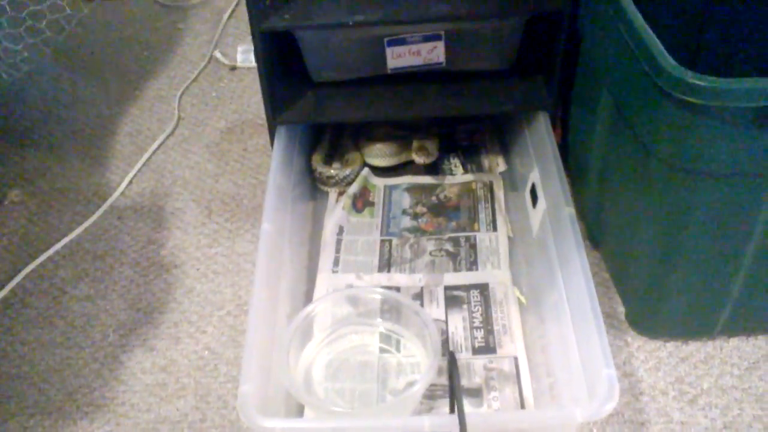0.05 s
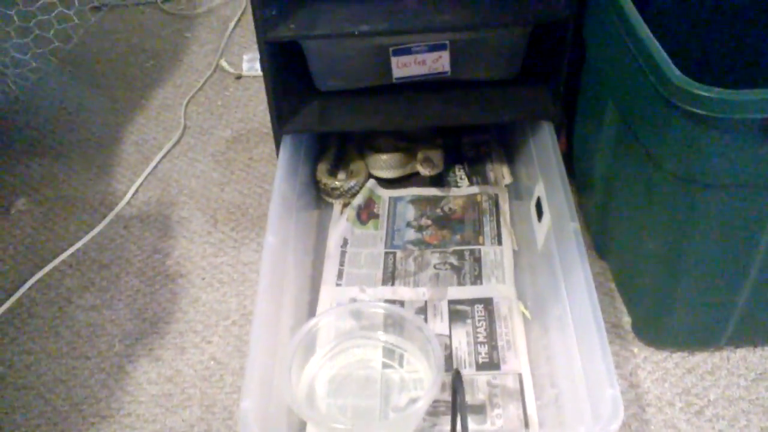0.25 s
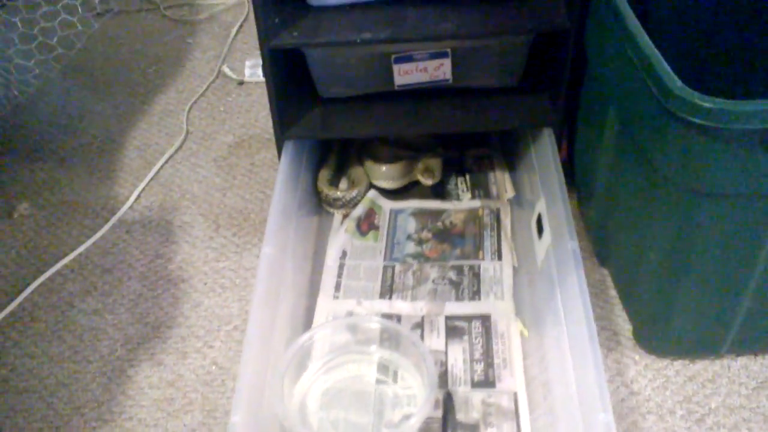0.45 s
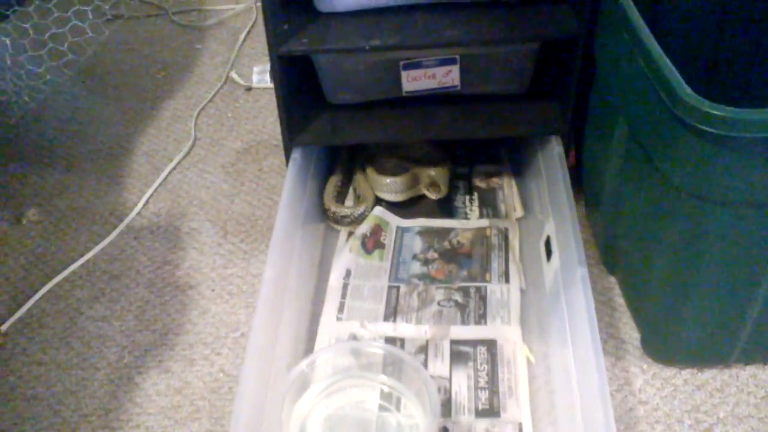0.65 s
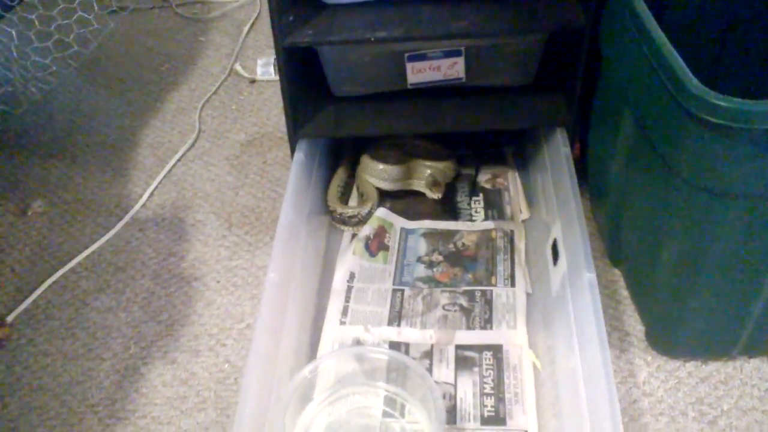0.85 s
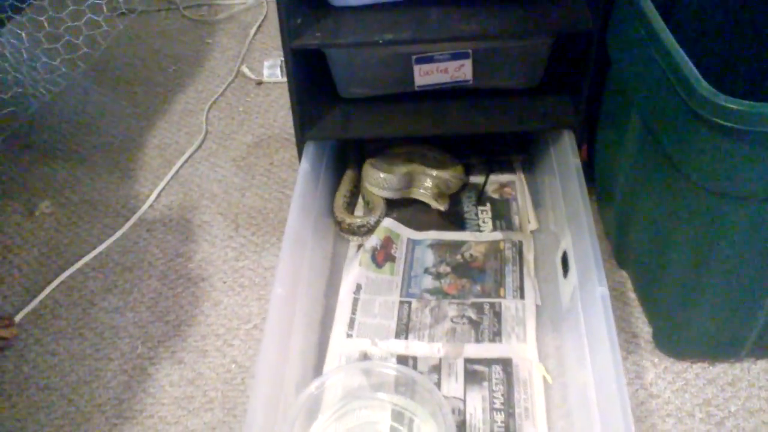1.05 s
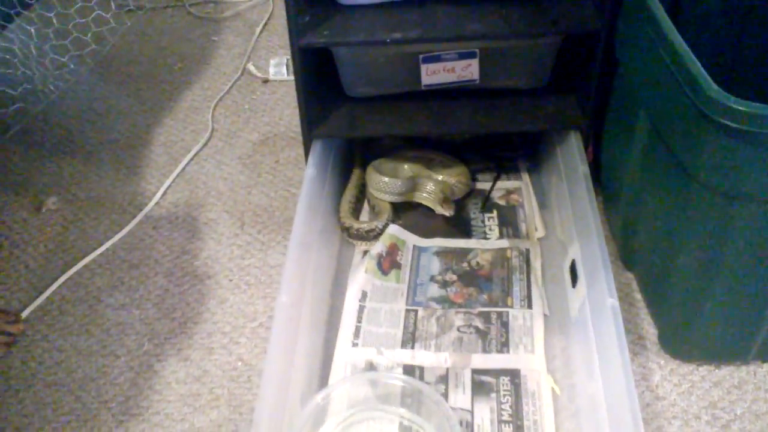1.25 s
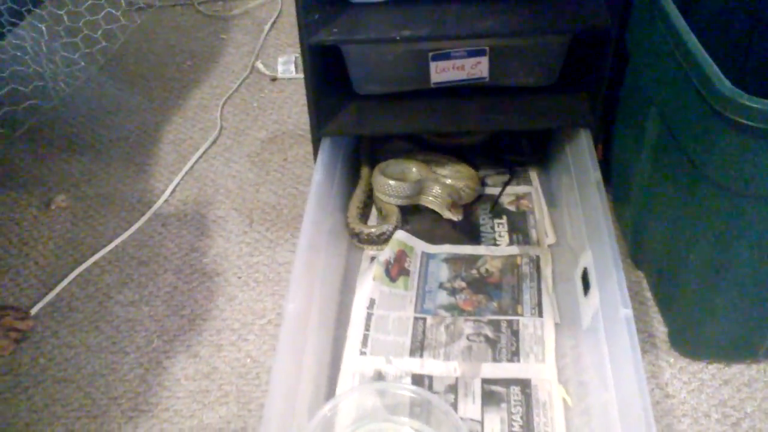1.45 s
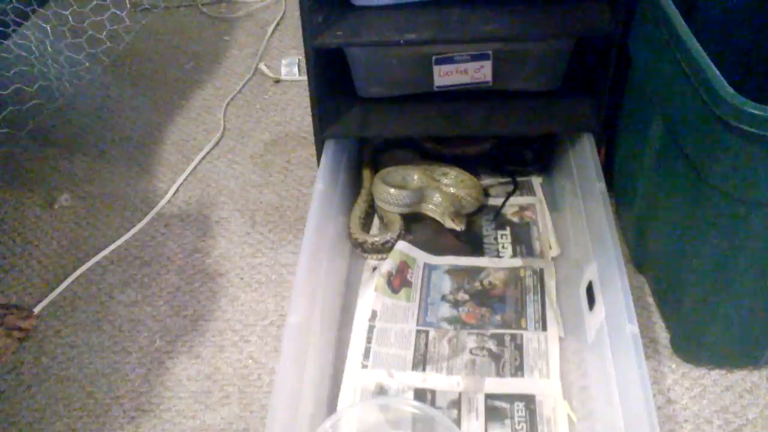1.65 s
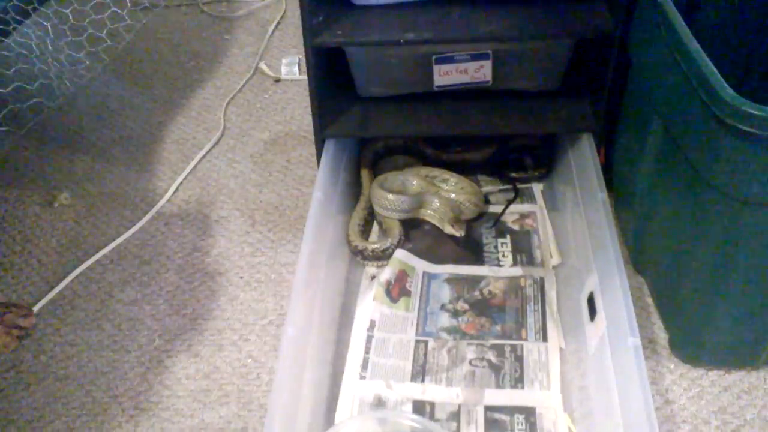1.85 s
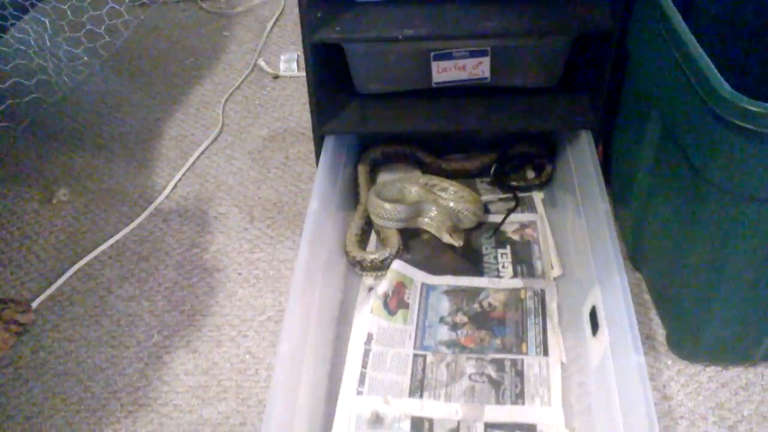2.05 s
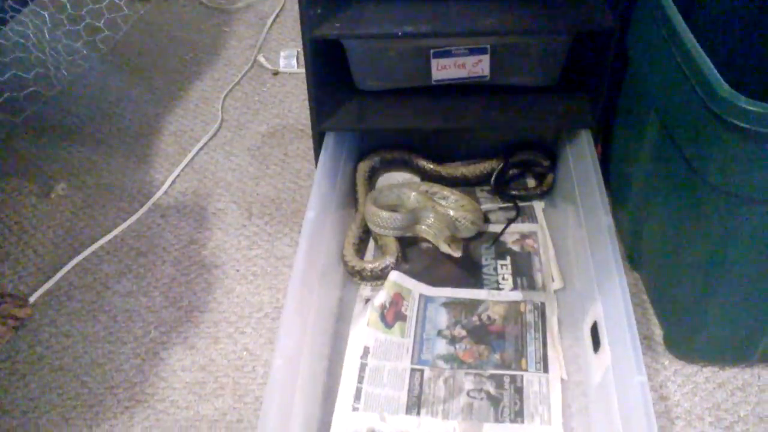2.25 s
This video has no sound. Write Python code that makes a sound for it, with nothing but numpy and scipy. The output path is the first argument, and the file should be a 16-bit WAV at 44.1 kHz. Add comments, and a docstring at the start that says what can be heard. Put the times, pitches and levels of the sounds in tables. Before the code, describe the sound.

In a quiet room, a plastic drawer is pulled out, rumbling and rasping unevenly as its runners catch and slip. Near the end a snake's short hiss swells, and the drawer stops with a soft bump.

```python
"""Sliding a snake's drawer

A plastic tub drawer slides along its rack in a quiet carpeted room. The runners catch
and slip, so the tub rumbles and drones, and scrapes more brightly when pulled faster.
The snake inside hisses faintly, then gives one short, stronger hiss as the drawer stops."""
import sys
import numpy as np
from scipy import signal
from scipy.fft import rfft, irfft
from scipy.io import wavfile

SR = 44100
rng = np.random.default_rng(int(sys.argv[2]) if len(sys.argv) > 2 else 0)


def wav_out(sig):
    """Save sig, one row per channel (or a flat mono array), as 16-bit PCM at SR to the path in sys.argv[1]."""
    wavfile.write(sys.argv[1], SR, np.round(np.clip(np.atleast_2d(sig).T, -1, 1) * 32767).astype(np.int16))


N = 105840
T = np.arange(N) / SR

# the notes at which the tub's floor rings: pitch_hz, width_hz, level_db
TUB_NOTES = [(199.3, 13, -12), (255.4, 13.1, -0.5), (272.3, 9.8, -3), (316.3, 11, -0.5), (356.3, 26, -5),
             (382.8, 21.9, -1.5), (406.3, 28.5, -7), (425.6, 20.8, -9)]
# the pitch that is shaken hardest as the runners travel: time_s, pitch_hz
TUB_STRONGEST_PITCH = [(.235, 308), (.29, 248), (.46, 283), (.55, 366), (.66, 375), (.79, 269), (.92, 347),
                       (1.03, 282), (1.22, 346), (1.33, 290), (1.39, 340), (1.44, 322), (1.5, 375),
                       (1.66, 322), (1.78, 290), (1.92, 424), (2.04, 315), (2.12, 306)]
# how hard the runners rub: time_s, level_db
RUB_FORCE = [(.05, -77), (.19, -66), (.235, -45.5), (.28, -52.5), (.34, -53), (.49, -39.5), (.62, -30),
             (.74, -33.5), (.8, -32), (.92, -37), (1.03, -33.5), (1.24, -39.5), (1.4, -36), (1.56, -36),
             (1.76, -40), (1.92, -34), (2.05, -32), (2.12, -41.5), (2.18, -64), (2.38, -72)]

def tub_drone():
    """The runners catch and slip, which keeps the tub's floor ringing."""
    pitch_hz = curve(TUB_STRONGEST_PITCH)
    judder = resonate(friction(), pitch_hz, width_hz=223)
    judder = resonate(judder, pitch_hz, width_hz=223)  # twice, for a sharper peak
    drone = rubbed(judder, TUB_NOTES, low_hz=167, high_hz=566, steady_s=0.11)
    return amp(curve(RUB_FORCE)) * drone

# loudness of the scrape, which rises with the speed of the pull: time_s, level_db
SCRAPE_LOUDNESS = [(.19, -81.5), (.215, -66.5), (.26, -78.5), (.36, -74.5), (.5, -58), (.65, -50.5),
                   (.88, -60), (1.02, -60), (1.26, -64.5), (1.42, -61.5), (1.56, -65), (1.615, -60),
                   (1.72, -68), (1.84, -63), (1.98, -55), (2.09, -47.5), (2.15, -58), (2.2, -80)]
# tone of the scrape: pitch_hz, level_db
SCRAPE_TONE = [(200, -26.5), (450, -1), (800, 0.5), (1080, 1), (1250, 3), (1400, -3), (1560, 0.5),
               (1830, -4.5), (2050, -10), (2400, -14), (4000, -25), (7000, -31.5), (16000, -54.5)]

def runner_scrape():
    """The sliding runners rasp: smooth noise roughened by tiny catches."""
    rough_noise = rng.standard_normal(N) + 0.57 * friction()
    return amp(curve(SCRAPE_LOUDNESS)) * reflected(coloured(rough_noise, SCRAPE_TONE))

# the notes at which the tub's side walls ring: pitch_hz, width_hz, level_db
WALL_NOTES = [(523, 22.4, 2), (566.7, 44, -2.5), (601.4, 94, -3.5), (679.6, 30.6, -5.5), (696, 65, -11),
              (770, 44, -7.5), (884, 128, -12.5)]
# the pitch that is shaken hardest, sinking as the drawer travels: time_s, pitch_hz
WALL_STRONGEST_PITCH = [(.2, 780), (.42, 793), (.62, 650), (.9, 636), (1.4, 579), (1.75, 553), (2.0, 593),
                        (2.1, 547)]

def wall_drone(scrape_share=0.43):
    """The side walls ring, following partly the scrape and partly the rubbing force."""
    chatter = resonate(friction(), curve(WALL_STRONGEST_PITCH), width_hz=340)
    drone = rubbed(chatter, WALL_NOTES, low_hz=380, high_hz=1020, steady_s=0.06)
    push_db = scrape_share * curve(SCRAPE_LOUDNESS) + (1 - scrape_share) * curve(RUB_FORCE)
    return amp(push_db - 2) * drone

# the low notes at which the tub and its rack flex: pitch_hz, width_hz, level_db
RACK_NOTES = [(39.6, 10, -17.5), (65.4, 16, -6.5), (79.9, 13.5, -0.5), (105, 23.7, -2), (117.6, 16.5, -2.5),
              (149.2, 30.6, -10)]
# loudness of the rumble: time_s, level_db
RUMBLE_LOUDNESS = [(.19, -69), (.21, -44.5), (.24, -41.5), (.35, -51), (.43, -41), (.56, -42.5),
                   (.63, -40.5), (.9, -42), (1.08, -42), (1.3, -43), (1.62, -41), (1.85, -46),
                   (2.05, -42.5), (2.125, -41), (2.16, -54), (2.22, -74)]

def rack_rumble():
    """Rubbing makes the tub and its rack flex slowly and rumble."""
    rumble = rubbed(friction(), RACK_NOTES, low_hz=29.8, high_hz=213, steady_s=0.26)
    return amp(curve(RUMBLE_LOUDNESS)) * rumble

# harder catches of the runners: start_s, peak_db
HARD_CATCHES = [(.232, -40.5), (.363, -38), (.528, -27.5), (.553, -33), (.596, -30.5), (.639, -27),
                (.661, -26), (.779, -24), (.797, -26), (.82, -31.5), (.863, -30), (1.03, -27.5),
                (1.379, -27), (1.393, -42), (1.875, -41), (1.897, -31.5), (1.986, -40), (2.022, -30.5)]
# jolts as the drawer starts, snags and stops: start_s, peak_db
RACK_JOLTS = [(.228, -43.5), (.41, -42.5), (.618, -32), (.80, -40), (1.07, -39), (2.098, -41.5)]

def bumps():
    """Hard catches knock the tub, damped by the hand and runner; jolts shake the rack."""
    knocks = struck(HARD_CATCHES, TUB_NOTES, damping=1.67, low_hz=216, high_hz=790)
    thuds = struck(RACK_JOLTS, RACK_NOTES, damping=1.5, low_hz=40, high_hz=250)
    return knocks + thuds

# loudness of the swish: time_s, level_db
SWISH_LOUDNESS = [(.33, -99), (.45, -75), (.65, -63.5), (.88, -68.5), (.94, -64.5), (1.12, -66.5),
                  (1.28, -69), (1.4, -64.5), (1.6, -64.5), (1.72, -65.5), (1.9, -64.5), (1.94, -61),
                  (2.1, -65), (2.2, -77)]
# tone of the swish: pitch_hz, level_db
SWISH_TONE = [(600, -27.5), (1800, -5), (2500, 0), (3000, 0.5), (4100, -0.5), (4800, -5), (5900, -7.5),
              (8000, -23.5), (11000, -27.5), (16000, -35.5)]
# tone of the ticks: pitch_hz, level_db
TICK_TONE = [(1500, -12), (4000, 1.5), (6500, 2), (9000, -6.5), (16000, -11)]

def plastic_swish(ticks_per_s=62):
    """Plastic slides on plastic with a fine swish and faint ticks of paper and grit."""
    level_db = curve(SWISH_LOUDNESS) + drift(rate_hz=20)  # flutters by about 1 dB
    rough_noise = rng.standard_normal(N) + 0.17 * friction()
    swish = reflected(coloured(rough_noise, SWISH_TONE))
    taps = rng.uniform(-1, 1, N) * (rng.random(N) < ticks_per_s / SR)
    t = np.arange(SR // 50) / SR
    one_tick = rng.standard_normal(len(t)) * np.exp(-t / .003)
    ticks = coloured(signal.fftconvolve(taps, one_tick)[:N], TICK_TONE)
    return amp(level_db) * (swish + amp(-17.5) * ticks)

# the snake's two hisses: start_s, rise_s, hold_s, fall_s, level_db
SNAKE_HISSES = [(-.2, 0.14, .22, 0.11, -72.5), (1.842, 0.3, 0.017, 0.21, -50)]
# tone of the hiss: pitch_hz, level_db
HISS_TONE = [(130, -11), (260, 5.5), (500, 1), (1200, 1.5), (1650, -1.5), (2080, 1.5), (2450, -2.5),
             (3000, 0.5), (3500, -1), (4050, 1.5), (4800, -8.5), (6200, -13), (8000, -21), (11000, -31),
             (16000, -39)]

def snake_hiss():
    """Air forced through the snake's throat swells, holds and dies away."""
    airflow = np.zeros(N)
    for start_s, rise_s, hold_s, fall_s, level_db in SNAKE_HISSES:
        swell = np.clip((T - start_s) / rise_s, 0, 1) ** 1.1
        fade = np.clip(1 - (T - start_s - rise_s - hold_s) / fall_s, 0, 1) ** 1.13
        airflow += amp(level_db) * swell * fade
    return airflow * reflected(coloured(rng.standard_normal(N), HISS_TONE))

# tone of the background noise: pitch_hz, level_db
ROOM_TONE = [(18, -16.5), (35, -4.5), (60, 1.5), (100, -13), (170, -15.5), (350, -20), (700, -33.5),
             (1500, -34), (4000, -31.5), (6000, -36.5), (9000, -43), (17000, -42)]

def quiet_room():
    """The room's low murmur and faint microphone noise."""
    return amp(-62) * coloured(rng.standard_normal(N), ROOM_TONE)

def friction(catches_per_s=900):
    """Tiny catches of uneven size over smooth sliding noise."""
    size = amp(4 * np.minimum(rng.exponential(1, N), 3))
    catches = size * rng.standard_normal(N) * (rng.random(N) < catches_per_s / SR)
    return evened(catches) + 0.65 * rng.standard_normal(N)

def ring(notes, damping=1):
    """The sound of one tap: wider notes and more damping die away sooner."""
    t = np.arange(SR // 2) / SR
    sound = np.zeros(len(t))
    for k, (pitch_hz, width_hz, level_db) in enumerate(notes):
        fade = amp(level_db) * width_hz * np.exp(-np.pi * width_hz * damping * t)
        sound += (-1) ** k * fade * np.sin(2 * np.pi * pitch_hz * t)
    return sound

def rubbed(shaking, notes, low_hz, high_hz, steady_s):
    """Rubbing rings the notes; the steady pull holds their average strength."""
    ringing = signal.fftconvolve(shaking, ring(notes))[:N]
    ringing = evened(band(ringing, low_hz, high_hz))
    window = signal.windows.hann(2 * int(steady_s * SR / 2) + 1)
    power = signal.fftconvolve(ringing ** 2, window / window.sum(), "same")
    return ringing / np.sqrt(abs(power) + 1e-4)

def struck(blows, notes, damping, low_hz, high_hz):
    """Single blows ring the notes."""
    taps = np.zeros(N)
    for start_s, peak_db in blows:
        taps[round(start_s * SR)] += amp(peak_db)
    knock = band(ring(notes, damping), low_hz, high_hz)
    return signal.fftconvolve(taps, knock / abs(knock).max())[:N]

def reflected(x, echo_db=-7.5, fade_s=0.14):
    """Adds quick echoes from the tub's walls and the room; they drop 60 dB in fade_s."""
    t = np.arange(SR // 5) / SR
    bounces = rng.standard_normal(len(t)) * (rng.random(len(t)) < .03)
    bounces *= np.exp(-np.log(1000) * t / fade_s)
    echoes = signal.fftconvolve(x, bounces / np.linalg.norm(bounces))[:N]
    return evened(x + amp(echo_db) * echoes)

def resonate(x, pitch_hz, width_hz):
    """Brings out the part of x near a moving pitch."""
    turn = np.exp(2j * np.pi * np.cumsum(pitch_hz) / SR)
    decay = np.exp(-np.pi * width_hz / SR)
    return 2 * (turn * signal.lfilter([1 - decay], [1, -decay], x / turn)).real

def band(x, low_hz, high_hz):
    """Keeps the range of pitches that a part gives off well."""
    return signal.sosfilt(signal.butter(2, [low_hz, high_hz], "band", fs=SR, output="sos"), x)

def coloured(x, tone):
    """Shapes the lows and highs of x by a tone table, at average strength 1."""
    pitch_hz, level_db = np.transpose(tone)
    hz = np.fft.rfftfreq(N, 1 / SR)
    gain = amp(np.interp(np.log(hz + 1), np.log(pitch_hz), level_db))
    return evened(irfft(rfft(x) * gain, N))

def drift(rate_hz):
    """A slow random wobble of average strength 1."""
    hz = np.fft.rfftfreq(N, 1 / SR)
    return evened(irfft(rfft(rng.standard_normal(N)) / (1 + (hz / rate_hz) ** 4), N))

def curve(points):
    """Joins (time_s, value) points with straight lines."""
    return np.interp(T, *np.transpose(points))

def evened(x):
    """Scales x to an average strength (rms) of 1."""
    return x / np.sqrt(np.mean(x ** 2) + 1e-20)

def amp(db):
    """Turns decibels into a number to multiply by."""
    return 10 ** (np.asarray(db) / 20)

def scene():
    """The quiet room, the drawer and the snake, in one channel."""
    room = quiet_room()
    drawer = rack_rumble() + tub_drone() + wall_drone() + runner_scrape() + bumps() + plastic_swish()
    return (room + drawer + snake_hiss())[None]

def record(dry):
    """Cuts the very highest treble."""
    treble_cut = signal.firwin(511, 17100, window=("kaiser", 9), fs=SR)
    return signal.oaconvolve(dry, treble_cut[None], "same")

dry = scene()
out = record(dry)
wav_out(out)
```